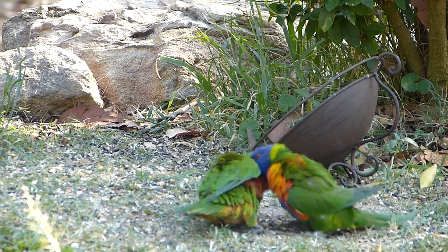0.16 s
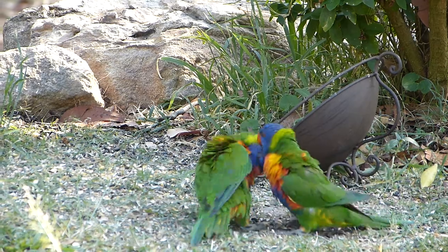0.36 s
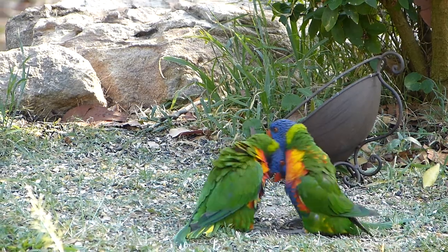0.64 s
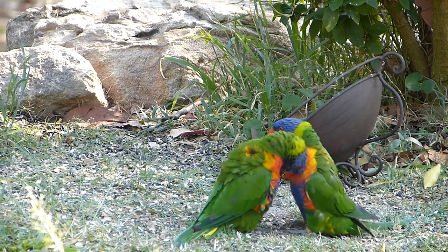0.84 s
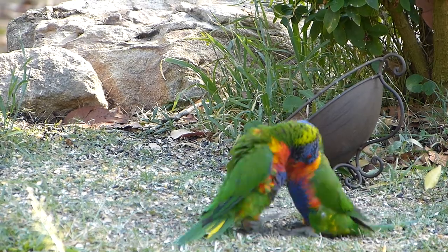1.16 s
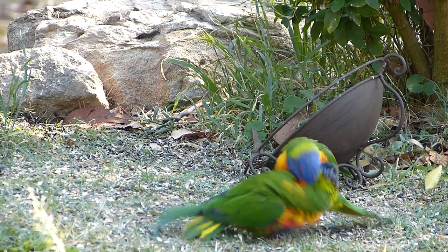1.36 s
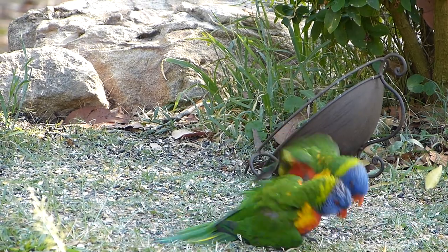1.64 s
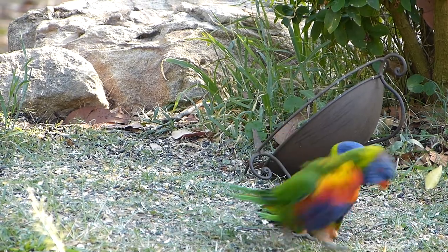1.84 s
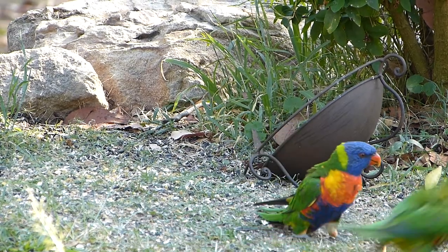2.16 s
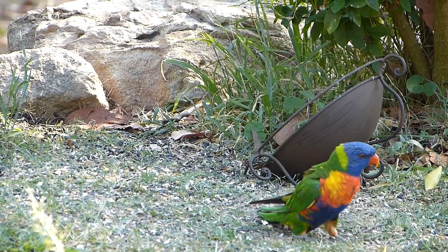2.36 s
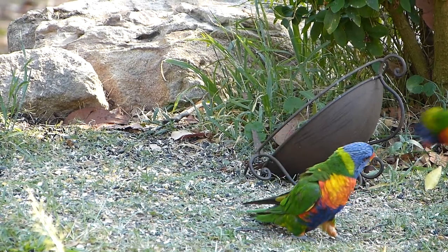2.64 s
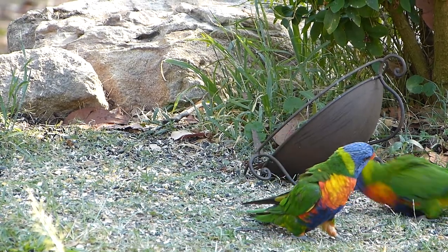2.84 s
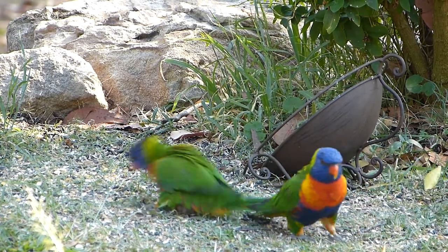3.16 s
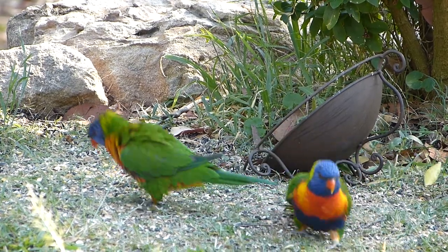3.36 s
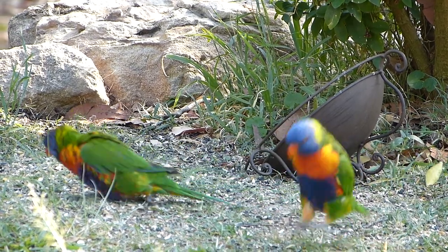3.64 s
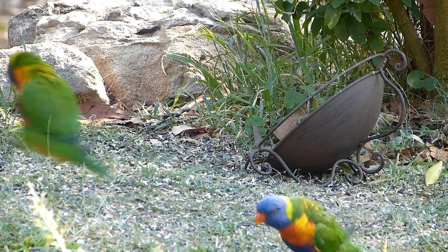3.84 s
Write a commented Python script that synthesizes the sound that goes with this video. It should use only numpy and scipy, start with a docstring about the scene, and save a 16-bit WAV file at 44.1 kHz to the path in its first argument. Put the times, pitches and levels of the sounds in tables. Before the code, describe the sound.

Lorikeet screeches burst out early, with a rasp and gritty scuffle, then again mid-way; after a pause with distant piping, a bright final shriek. Open garden, light reverberation, slightly dull stereo microphone, steady soft outdoor noise.

```python
"""Lorikeets squabbling on gravel

Two lorikeets scuffle in a garden, a few metres away. They screech (a high whistle that a second oscillator
breaks into harsh sidebands), rasp (a lower voice that turns chaotic) and whine softly between and during
the screeches. Wings and feet stir the gravel with shaped noise, other birds call far off in gliding tones,
and walls and trees ring over steady outdoor noise."""
import sys
import numpy as np
from scipy import signal
from scipy.fft import rfft, irfft
from scipy.io import wavfile
from scipy.ndimage import uniform_filter1d, map_coordinates

SR = 44100
rng = np.random.default_rng(int(sys.argv[2]) if len(sys.argv) > 2 else 0)


def to_wav(sig):
    """Store sig (one row per channel, or 1-D mono) as 16-bit WAV at the path in sys.argv[1].

    Samples outside -1..1 are clipped; the rate is SR.
    """
    pcm = np.clip(np.atleast_2d(sig), -1, 1) * 32767
    pcm = np.round(pcm).astype(np.int16)
    wavfile.write(sys.argv[1], SR, pcm.T)  # frames by channels


N = 176400  # 4 seconds of samples
T = np.arange(N) / SR


def amp(db):
    """Decibels to gain."""
    return 10 ** (np.asarray(db) / 20)


def unit(x):
    """Scale to rms 1."""
    return x / np.sqrt(np.mean(x ** 2))


def colour(x, points):
    """Filter by a curve drawn through (Hz, dB) points."""
    hz, db = np.array(points, float).T
    f = np.maximum(np.fft.rfftfreq(2 * N, 1 / SR), 1)
    gain = amp(np.interp(np.log(f), np.log(hz), db))
    return irfft(rfft(x, 2 * N) * gain)[..., :N]


def noise(points):
    """Coloured noise of rms 1."""
    return unit(colour(rng.standard_normal(N), points))


def wander(hz):
    """Smooth random motion up to about hz, spread 1."""
    f = np.fft.rfftfreq(N, 1 / SR)
    lowpass = np.exp(-.5 * (f / hz) ** 2)
    return unit(irfft(rfft(rng.standard_normal(N)) * lowpass, N))


def steps(per_s):
    """Random values held for uneven times, spread about 1, with slightly smoothed corners."""
    held = np.cumsum(rng.random(N) < per_s / SR)
    return uniform_filter1d(rng.standard_normal(N)[held], size=40)


def turn(hz):
    """Phase of an oscillator in radians."""
    return 2 * np.pi * np.cumsum(hz) / SR


def swell(u):
    """Rounded rise and fall for u from 0 to 1."""
    return np.sin(np.pi * np.clip(u, 0, 1))


ATTACK_S = .007


def loudness(times, db):
    """Gain along a dB curve, eased in and out."""
    edge = np.clip(np.minimum(T - times[0], times[-1] - T) / ATTACK_S, 0, 1)
    return amp(np.interp(T, times, db)) * np.sin(edge * np.pi / 2) ** 2


def stereo(mid, side):
    """Left and right from mid and side."""
    return np.array([mid + side, mid - side])


# Colour of the outdoor noise shared by both ears (mid) and of its left-right difference (side).
# Each row: frequency in Hz, level in dB.
AIR_MID_COLOUR = [(25, -24.5), (150, -34), (240, -26.5), (850, -18.5), (1800, -25), (5000, -18.5),
                  (9200, -16.5), (11500, -28.5), (14000, -54)]
AIR_SIDE_COLOUR = [(25, -26), (130, -29), (260, -16.5), (900, -12), (3200, -21), (9500, -13), (14000, -39)]
AIR_MID_DB, AIR_SIDE_DB = -51.5, -54


def outdoor_air():
    """Steady wide outdoor noise: two coloured noises whose level drifts slowly by a dB or so."""
    mid = amp(AIR_MID_DB) * noise(AIR_MID_COLOUR)
    side = amp(AIR_SIDE_DB) * noise(AIR_SIDE_COLOUR)
    return stereo(mid, side) * amp(0.88 * wander(1))


# Near echoes off ground, stones and wall.
# Each row: delay in ms, level in dB, amount of left-right difference (positive leans left).
NEAR_ECHOES = [(2.3, -24.5, 1), (8.56, -8.5, -1.02), (17.05, -8, 0.66), (28.83, -22, -1.1)]
# Colour of the long garden tail. Each row: frequency in Hz, level in dB.
TAIL_COLOUR = [(200, -58), (1200, -8.5), (2500, -17.5), (4300, 2), (6000, 1), (7500, -6.5), (12000, -7.5)]
# T60 is the time for a tail to fall by 60 dB
GARDEN_T60_S, GARDEN_DB = 1, -11
NEAR_T60_S, NEAR_DB = 0.27, -8
GARDEN_WIDTH = 0.41  # share of left-right difference in both tails


def garden(x):
    """A few near echoes, a short scatter from plants and a long tail from walls and trees."""
    def tail(t60):
        fade = amp(-60 * T / t60) * (1 - np.exp(-T / 0.032))  # builds up, then dies away
        spray = stereo(rng.standard_normal(N), GARDEN_WIDTH * rng.standard_normal(N))
        return spray * fade / np.sqrt(np.sum(fade ** 2))

    response = amp(GARDEN_DB) * colour(tail(GARDEN_T60_S), TAIL_COLOUR)
    response = response + amp(NEAR_DB) * tail(NEAR_T60_S)
    for delay_ms, db, side in NEAR_ECHOES:
        response[:, int(abs(delay_ms) * SR / 1000)] += amp(db) * stereo(0.8, side)
    return signal.fftconvolve(x[None], response, axes=1)[:, :N]


# Calls of far birds. Each row: start in seconds, length in seconds, start pitch in Hz, end pitch in Hz,
# relative level in dB, pitch jitter as a fraction.
FAR_BIRD_CALLS = [(0.283, 0.27, 5690, 5260, -59.5, 0.087), (0.316, 0.21, 1677, 1624, -65.5, 0.2),
                  (2.325, 0.38, 4965, 4550, -61.5, 0.093), (2.42, 0.335, 5610, 5560, -63, 0.0193),
                  (2.457, .18, 1957, 2383, -71.5, 0.059), (2.918, 0.17, 2107, 2447, -68.5, 0.061)]
# Thin piping notes. Each row: start in seconds, length in seconds, relative level in dB.
PIPING_NOTES = [(1.917, 0.047, -62.5), (2.02, 0.094, -68), (2.109, .11, -67.5), (2.218, 0.12, -74)]
PIPING_HZ, PIPING_SAG = 2430, .006  # start pitch, and the fraction it falls in each note


def far_birds():
    """Distant calls and thin piping notes: gliding sine tones with an unsteady pitch."""
    piping_end_hz = PIPING_HZ * (1 - PIPING_SAG)
    piping = [(start, length, PIPING_HZ, piping_end_hz, db, .005) for start, length, db in PIPING_NOTES]
    out, jitter = np.zeros(N), wander(542)
    for start, length, hz0, hz1, db, rough in list(FAR_BIRD_CALLS) + piping:
        u = np.clip((T - start) / length, 0, 1)
        glide = hz0 + (hz1 - hz0) * u
        out += amp(db) * swell(u) * np.sin(turn(glide * (1 + rough * jitter)))
    return out


# Feet and wings on gravel. Each row: start in seconds, length in seconds, thud level in dB, grit level in dB.
GRAVEL_SCUFFS = [(0.638, 0.27, -52.5, -37), (1.553, 0.078, -56.5, -44), (3.895, 0.022, -63, -69),
                 (3.935, 0.0087, -50, -67)]
# Colours of the soft thump and of the stones. Each row: frequency in Hz, level in dB.
THUD_COLOUR = [(30, -2), (250, -6), (600, 5), (3000, -17.5)]
GRIT_COLOUR = [(500, -12), (2500, 20.5), (6500, 25), (11000, -40), (15000, -43)]
GRIT_SPREAD = .65  # how unevenly the grit sprays


def scuffs():
    """Soft thumps of wings and feet with a spray of grit: two noises of uneven strength."""
    thud = unit(noise(THUD_COLOUR) * np.exp(0.18 * wander(89)))
    grit = unit(noise(GRIT_COLOUR) * np.exp(GRIT_SPREAD * wander(410)))
    out = np.zeros(N)
    for start, length, thud_db, grit_db in GRAVEL_SCUFFS:
        out += swell((T - start) / length) * (amp(thud_db) * thud + amp(grit_db) * grit)
    return out


# Soft whines, quick chatter strokes and steep upward pitch breaks in the screeches.
# Each row: start in seconds, length in seconds, start pitch in Hz, end pitch in Hz, level in dB,
# change in dB from one overtone to the next.
SHORT_GLIDES = [(0.506, 0.11, 1809, 1473, -40.5, -22), (0.577, 0.059, 2720, 3040, -45, 4.5),
                (0.82, 0.081, 1713, 1620, -44.5, -15), (0.956, 0.089, 1517, 1659, -39.5, -8),
                (1.238, 0.037, 2380, 2015, -44.5, 2), (1.275, .025, 2470, 2017, -35, 3),
                (1.293, .03, 1176, 1028, -39.5, 1), (1.314, 0.025, 2266, 1950, -39.5, 0.5),
                (1.342, 0.029, 1970, 1560, -40.5, 6.5), (1.358, 0.023, 3990, 3720, -38, 14),
                (1.372, 0.012, 3740, 2930, -32.5, 9), (1.407, 0.019, 3650, 3090, -38.5, 7.5),
                (1.276, 0.013, 4966, 4360, -33, -14), (1.439, 0.016, 5900, 4600, -41, -10),
                (1.418, 0.022, 2492, 2080, -36, 4), (1.438, 0.063, 2300, 2000, -39.5, -10),
                (1.455, .012, 3960, 4100, -34, 13), (1.49, 0.0068, 3960, 5300, -33, 8),
                (2.789, .046, 2950, 4460, -41.5, -11), (3.099, .009, 3480, 4700, -33, 15),
                (3.162, 0.058, 1530, 1730, -48.5, -3.5), (3.29, 0.087, 1750, 1578, -53.5, -7)]
GLIDE_JITTER = .03  # random pitch shake, as a fraction
TRILL_HZ, TRILL_DEPTH, TRILL_BEND = 115, .45, .02  # average rate, loudness swing, pitch swing


def whines_and_breaks():
    """Short gliding notes with a few overtones, shaken by a fast uneven trill."""
    trill = np.sin(turn(TRILL_HZ * (1 + .25 * wander(62.2))))
    bend = 1 + GLIDE_JITTER * wander(760) + TRILL_BEND * trill
    shake = (1 + TRILL_DEPTH * trill) * np.exp(0.28 * wander(330))
    k = np.arange(1, 6)[:, None]  # overtone numbers
    out = np.zeros(N)
    for start, length, hz0, hz1, db, tilt_db in SHORT_GLIDES:
        i = (T > start) & (T < start + length)
        u = (T[i] - start) / length
        phase = turn((hz0 + (hz1 - hz0) * u) * bend[i])
        sizes = amp(tilt_db * (k - 1)) / (1 + (k * hz0 / 7000) ** 8)  # weak above 7000 Hz
        tone = (sizes * np.sin(k * phase)).sum(0) * np.sqrt(2 / np.sum(sizes ** 2))
        out[i] += amp(db) * swell(u) * shake[i] * tone
    return out


# Narrow throat resonances. Each row: frequency in Hz, width in Hz, level in dB.
THROAT_RINGS = [(1396, 27, -8.5), (3024, 170, -6)]
RASP_JITTER, RASP_SHIMMER, RASP_AIR_DB = .1, .5, -6  # at roughness 1; the air noise is doubled below
RATTLE_HZ, RATTLE_DEPTH, RATTLE_DECAY = 210, 1.3, .3  # typical rate, depth, fade as a share of a cycle
THROAT_DRIFT, THROAT_DRIFT_HZ = .02, 22  # spread of the shift as a fraction, and its speed
SURGE, SURGE_HZ = .12, 70


def rasp(rows, throat, ring_db):
    """A low voice rich in overtones breaks up into chaos and quick rattling bursts that ring the throat."""
    times, hz, db, rough = np.array(rows, float).T
    hz, rough = np.interp(T, times, hz), np.interp(T, times, rough)
    phase = turn(hz * (1 + RASP_JITTER * rough * wander(600)))
    source = np.zeros(N)
    for k in range(1, 8):
        overtone = np.sin(k * phase + rng.uniform(0, 2 * np.pi))
        source += overtone * (1 + RASP_SHIMMER * rough * wander(480))
    source = unit(source) + amp(RASP_AIR_DB) * 2 * rough * rng.standard_normal(N)

    # each rattle cycle starts with a burst that dies away
    cycle = turn(RATTLE_HZ * np.exp(wander(120) / 3)) / (2 * np.pi) % 1
    bursts = 1 + RATTLE_DEPTH * rough * np.exp(-cycle / RATTLE_DECAY)
    body = unit(colour(source * bursts, throat))
    rings = np.zeros(N)
    for ring_hz, width_hz, level_db in THROAT_RINGS:
        b, a = signal.iirpeak(ring_hz, ring_hz / width_hz, SR)
        rings += amp(level_db) * unit(signal.lfilter(b, a, body))

    # the resonances shift as beak and tongue move: the voice is read at an uneven speed
    drift = np.cumsum(THROAT_DRIFT * wander(THROAT_DRIFT_HZ))
    sounding = (T > times[0]) & (T < times[-1])
    places = T * SR + drift - drift[sounding].mean()
    voice = map_coordinates(body + amp(ring_db) * rings, [places], mode="mirror")
    voice = voice * np.exp(SURGE * wander(SURGE_HZ))  # the effort comes in uneven surges
    return voice / voice[sounding].std() * loudness(times, db)


# One table per rasp. Each row: time in seconds, pitch in Hz, relative level in dB, roughness (about 0 to 1).
RASP_CALLS = [
    [(1.004, 1655, -25, 0.58), (1.018, 2052, -23, 0.72), (1.029, 2402, -15.5, 0.39),
     (1.043, 2280, -18, 0.33), (1.053, 2383, -19.5, 0.77), (1.061, 2153, -23, 1.05),
     (1.072, 2030, -15.5, 0.78), (1.093, 1888, -33, 0.62), (1.115, 1853, -44, 0.83)],
    [(1.64, 1537, -19, 0.27), (1.655, 1434, -19, 0.48), (1.672, 1477, -19, 0.82), (1.694, 1571, -15, 1),
     (1.704, 1543, -25, 0.97), (1.722, 1499, -23, 0.96), (1.735, 1389, -30.5, 0.57),
     (1.765, 1360, -67, 0.6)],
]
# Throat colour, one table per rasp. Each row: frequency in Hz, level in dB.
THROAT_COLOURS = [
    [(400, -67), (991, -12.5), (1820, -19.5), (2180, -12), (3100, -5.5), (4200, -8), (4660, 2), (5480, -7),
     (10900, -15.5), (14000, -38)],
    [(400, -54), (1020, -7.5), (1400, -16.5), (2300, -8), (3200, -6), (3620, -8), (4320, -7), (6650, -2.5),
     (9940, -9), (13000, -41)],
]
# Strength of the narrow throat resonances in dB, one number per rasp.
THROAT_RING_DB = [-29, -11.5]


def rasps():
    """All the rasps, each through its own throat shape."""
    return sum(rasp(*call) for call in zip(RASP_CALLS, THROAT_COLOURS, THROAT_RING_DB))


# Strength of the whistle and its multiples: one relative level in dB for each.
WHISTLE_OVERTONES_DB = [0, -16, -18]
# Colour of the breathy hiss. Each row: frequency in Hz, level in dB.
HISS_COLOUR = [(2700, -33), (4300, 0), (9000, 1.5), (12000, -25)]
SECOND_RATIO, SECOND_DEPTH, SECOND_DB = .25, .85, -29  # lower oscillator: pitch ratio, depth, own level
SECOND_JITTER, JUMP, JUMPS_PER_S = .3, .08, 170
JITTER, JITTER_HZ, SHIMMER, FLUTTER_HZ = 0.036, 860, 0.56, 260
WOBBLE, WOBBLE_HZ = .015, 130
BRIGHT_HZ, BRIGHT_WIDTH_HZ = 9400, 1960  # a beak resonance
SCREECH_DB, HISS_DB = 0.5, -10.5


def screech(rows, bright_db):
    """A whistle; with roughness it jumps in pitch, flutters, hisses and beats with a lower oscillator."""
    times, hz, db, rough = np.array(rows, float).T
    hz, rough = np.interp(T, times, hz), np.interp(T, times, rough)
    hz = hz * (1 + JUMP * rough * steps(JUMPS_PER_S))
    jitter = JITTER * rough * wander(JITTER_HZ)
    wobble = (0.00382 + WOBBLE * rough) * wander(WOBBLE_HZ)
    phase = turn(hz * (1 + jitter + wobble))
    second = turn(hz * SECOND_RATIO * (1 + SECOND_JITTER * rough * wander(403)))

    tone = np.zeros(N)
    for k, overtone_db in enumerate(WHISTLE_OVERTONES_DB, 1):
        # the resonance lifts (or, below 0 dB, weakens) a tone that passes it
        lift = bright_db * np.exp(-((k * hz - BRIGHT_HZ) / BRIGHT_WIDTH_HZ) ** 2)
        tone += amp(overtone_db + lift) * np.sin(k * phase) * (k * hz < SR / 2)

    # sidebands around the whistle, stronger below it
    depth = SECOND_DEPTH * rough
    voice = tone * (1 + depth / 2 * np.sin(second)) + depth / 2 * np.sin(phase - second)
    voice = voice / np.sqrt(1 + depth ** 2 / 2)
    voice = voice + rough * (amp(SECOND_DB) * np.sin(second) + amp(HISS_DB) * noise(HISS_COLOUR))
    shimmer = SHIMMER * np.sqrt(np.abs(rough))
    flutter = np.exp(shimmer * wander(FLUTTER_HZ) - shimmer ** 2)
    return voice * flutter * loudness(times, db) * amp(SCREECH_DB)


# One table per screech. Each row: time in seconds, pitch in Hz, relative level in dB, roughness from 0 to 1.
SCREECH_CALLS = [
    [(.65, 4320, -29, 0.38), (.666, 4350, -33, 0.34), (.674, 5230, -23, 0.42), (.681, 5570, -19, 0.19),
     (.694, 5720, -21, 0), (.703, 5415, -33, 0.13), (.707, 3980, -29, 0.26), (.738, 3512, -25.5, 0.23),
     (.752, 4516, -31.5, 0.33), (.761, 4740, -18, 0.06), (.767, 5670, -28.5, 0.34), (.785, 5900, -13, 0.08),
     (.791, 5896, -17, 0.12), (.796, 5677, -14, 0.18), (.806, 5710, -34, .7), (.836, 5410, -34, 0.77),
     (.843, 5310, -23, 0.22), (.851, 5186, -43, 1), (.884, 4990, -23.5, 0.75), (.897, 4130, -30.5, 0.61),
     (.93, 3980, -34, .6)],
    [(1.457, 4100, -29, 0.59), (1.464, 4466, -40, 0.42), (1.47, 4040, -26, 0.59), (1.474, 5700, -26, 0.32),
     (1.496, 5900, -24, 0.42), (1.501, 5400, -23, 0.27), (1.52, 5990, -15, 0.03),
     (1.538, 6190, -23.5, 0.04), (1.553, 5670, -18.5, 0.16), (1.568, 5660, -25, 0.24),
     (1.584, 4830, -29.5, 0.34), (1.608, 5010, -16, 0.17), (1.614, 5010, -31, .4), (1.623, 5905, -25, 0.4),
     (1.632, 5940, -15, 0.14), (1.643, 6160, -16, 0.08), (1.648, 5850, -32, 0.4)],
    [(3.092, 4860, -23.5, 0.88), (3.104, 5520, -31, 0.54), (3.109, 5580, -14.5, 0),
     (3.124, 5820, -10.5, 0.06), (3.14, 5473, -13.5, 0), (3.151, 5450, -30.5, 0.66),
     (3.18, 5485, -23.5, 0.44), (3.206, 4934, -24.5, 0.1), (3.219, 4667, -17.5, 0.06),
     (3.225, 5020, -17, 0.03), (3.228, 5840, -8.5, 0.07), (3.236, 5880, -17.5, 0.13),
     (3.252, 6180, -12, 0.02), (3.268, 6236, -15, .05), (3.274, 5720, -12, 0.02),
     (3.283, 5670, -15.5, 0.08), (3.286, 4990, -23.5, 0.16), (3.303, 4165, -29, 0.22),
     (3.312, 4650, -26, 0.02), (3.345, 4480, -44, 0.78)],
]
# The other side of the syrinx (the bird's voice organ) sounds along in the first and third screeches,
# one table per strand: two in the first, one in the third.
# Each row: time in seconds, pitch in Hz, relative level in dB, roughness from 0 to 1.
OTHER_SIDE_STRANDS = [
    [(.668, 4490, -30, 0.71), (.7, 4160, -36.5, 0.9)],
    [(.775, 4910, -27, .6), (.8, 4540, -31.5, 0.38), (.83, 4350, -44, 0.8)],
    [(3.15, 7130, -20, 0.26), (3.182, 6980, -28, 0.01), (3.198, 6530, -27, 0.42), (3.215, 6200, -12, 0.3)],
]
# Height of the beak resonance in dB, one number per screech.
BEAK_RESONANCE_DB = [-6, 0.5, 10]
# Colour of the open beak. Each row: frequency in Hz, level in dB.
BEAK_COLOUR = [(1600, 2.5), (2700, 0.5), (3400, -15.5), (4100, 1.5), (6200, -2), (7600, 2.5), (9400, 3.5),
               (10700, -7), (12200, -6.5), (15000, -2)]


def screeches():
    """The screeches and the strands from the other side of the syrinx, coloured by the open beak."""
    voices = sum(screech(*call) for call in zip(SCREECH_CALLS, BEAK_RESONANCE_DB))
    voices = voices + sum(screech(rows, -36) for rows in OTHER_SIDE_STRANDS)
    return colour(voices, BEAK_COLOUR)


def scene():
    """Steady air, far birds, gravel and the two near birds, each source but the air direct and echoed."""
    air = outdoor_air()
    far = far_birds()
    gravel = scuffs()
    near = amp(1.5) * screeches() + whines_and_breaks() + amp(-3.0) * rasps()
    direct = stereo(near, 0.033 * near) + amp(14.5) * far + gravel  # near birds slightly to the left
    echoed = garden(near + amp(15.0) * far) + amp(2.0) * garden(gravel)
    return direct + echoed + air


# Tone of the microphone. Each row: frequency in Hz, level in dB.
MIC_COLOUR = [(20, 7), (11000, -3), (12500, -10), (15000, -23)]
START_S, TOP_HZ, OFFSET = 0.377, 15000, -.003  # cut-in time, upper limit, steady offset of the wave


def record(dry):
    """Silence until the sound cuts in; the microphone dulls the very top, and the wave sits on a small steady
    offset."""
    cut_in = np.clip((T - START_S) / 0.0008, 0, 1)
    x = (colour(dry, MIC_COLOUR) + OFFSET) * cut_in
    return signal.sosfilt(signal.ellip(8, .2, 70, TOP_HZ, fs=SR, output="sos"), x)


dry = scene()
out = record(dry)
to_wav(out)
```